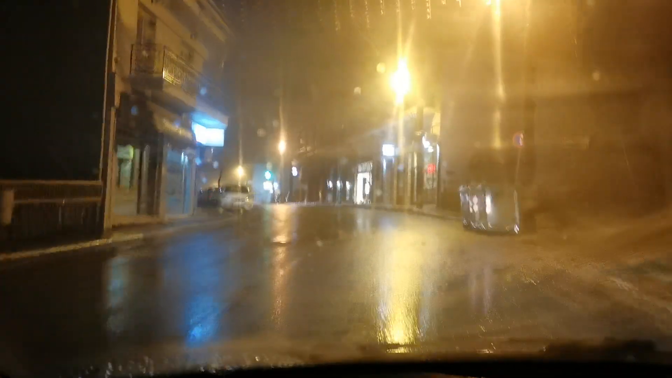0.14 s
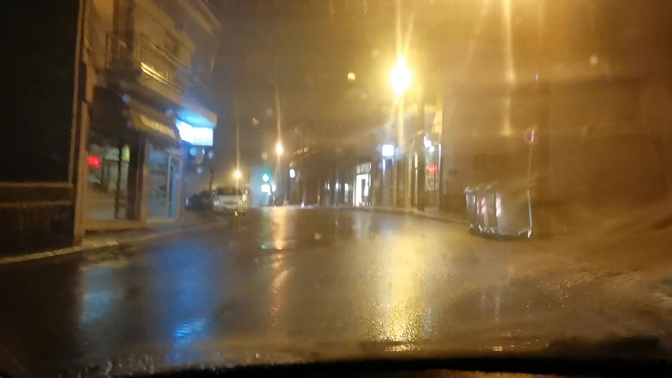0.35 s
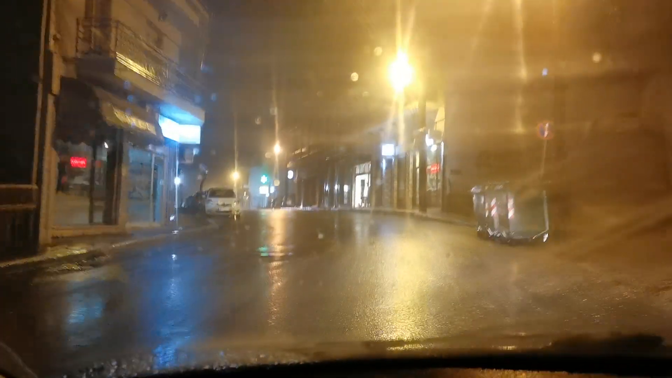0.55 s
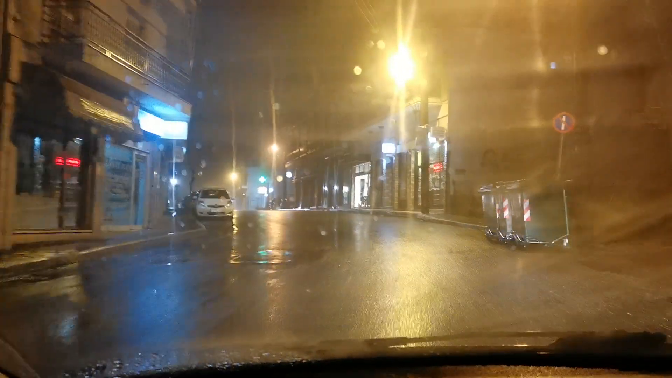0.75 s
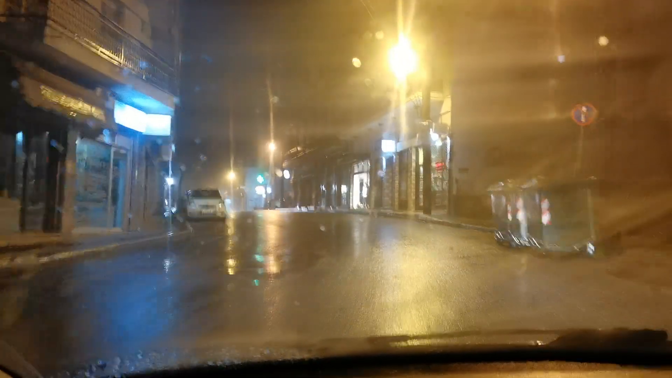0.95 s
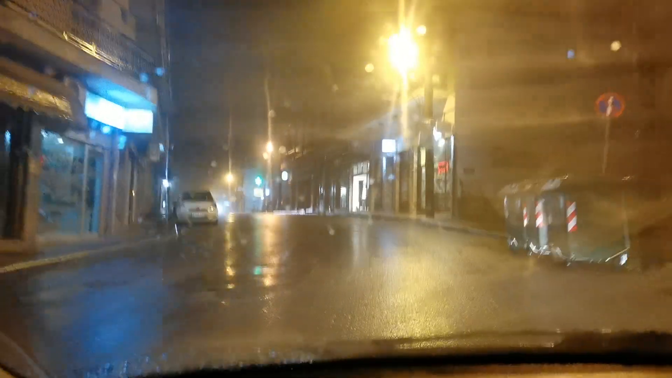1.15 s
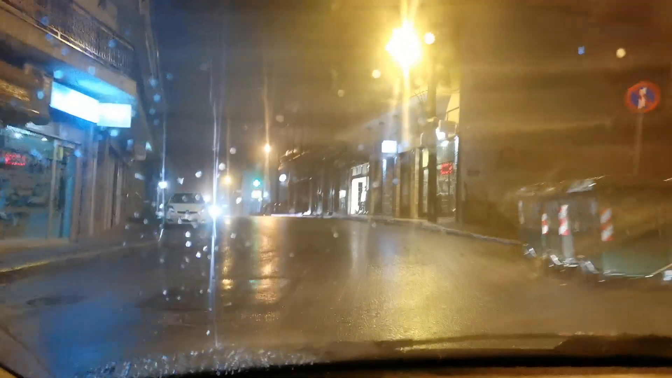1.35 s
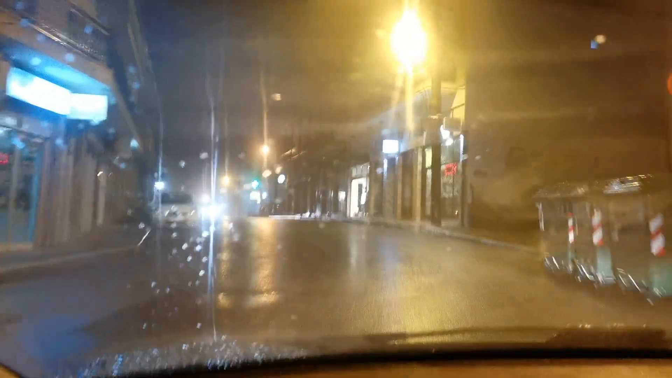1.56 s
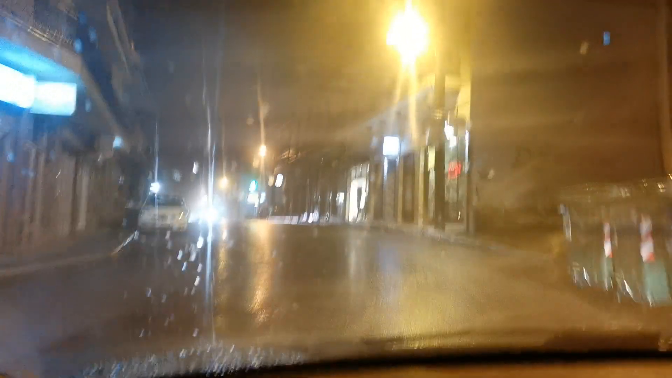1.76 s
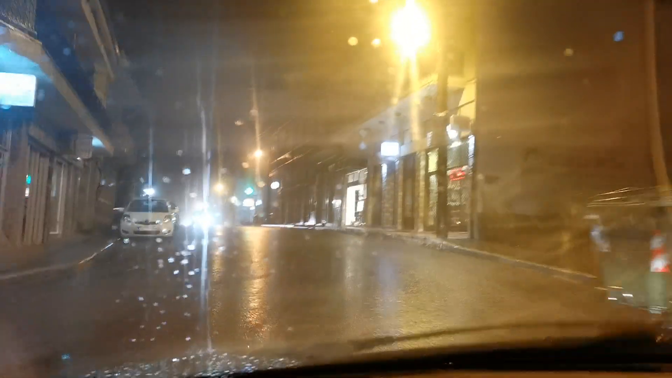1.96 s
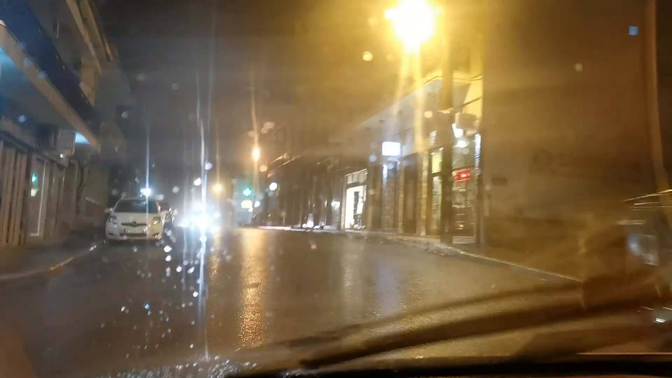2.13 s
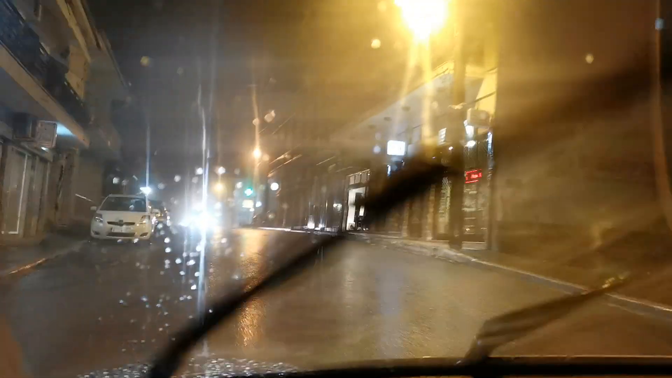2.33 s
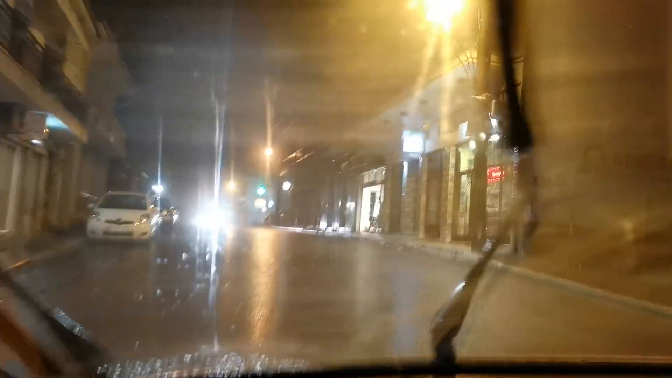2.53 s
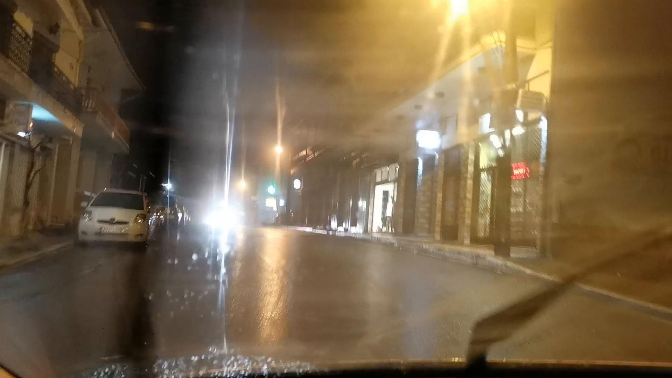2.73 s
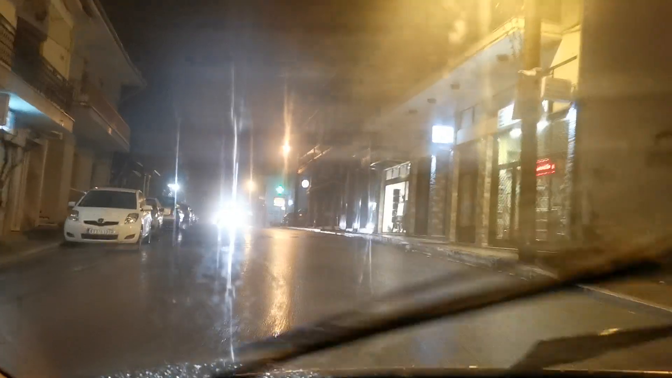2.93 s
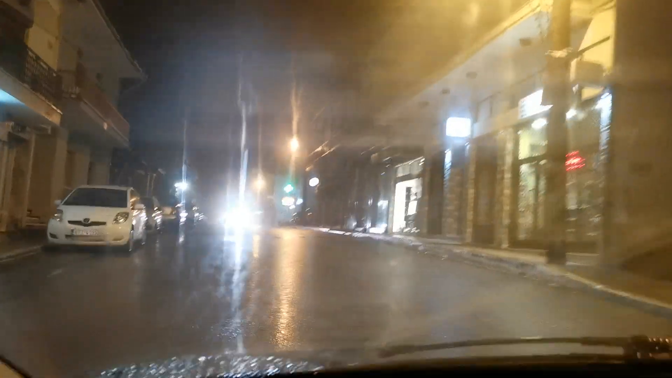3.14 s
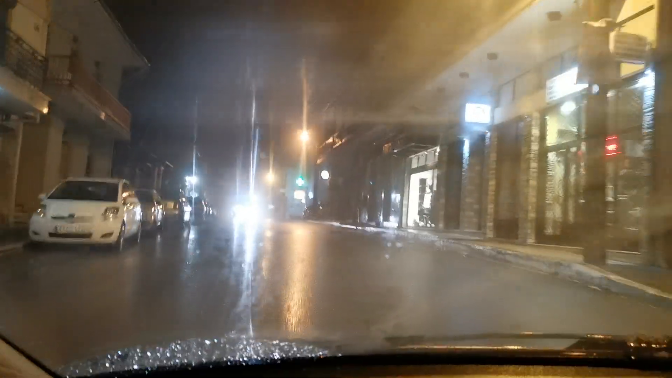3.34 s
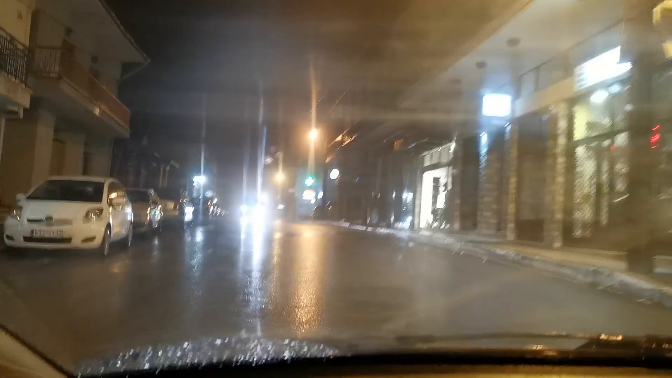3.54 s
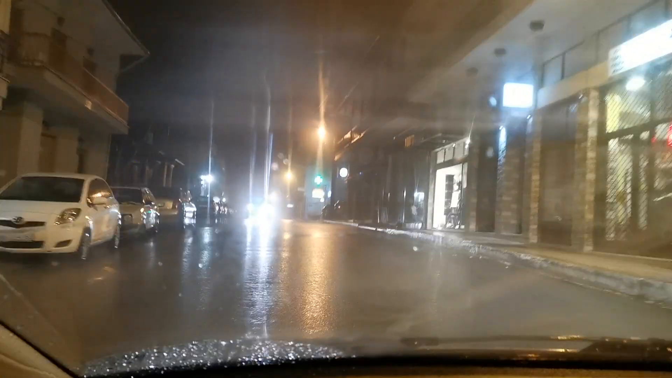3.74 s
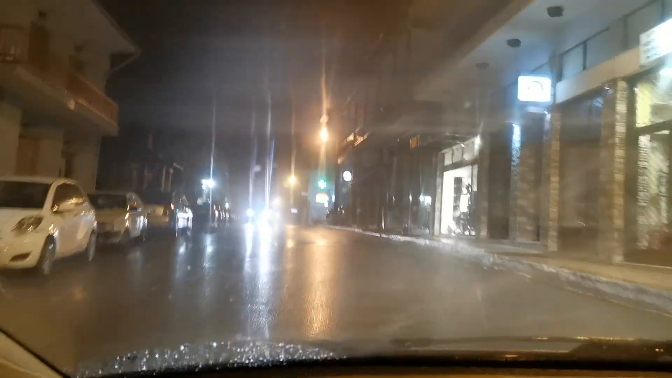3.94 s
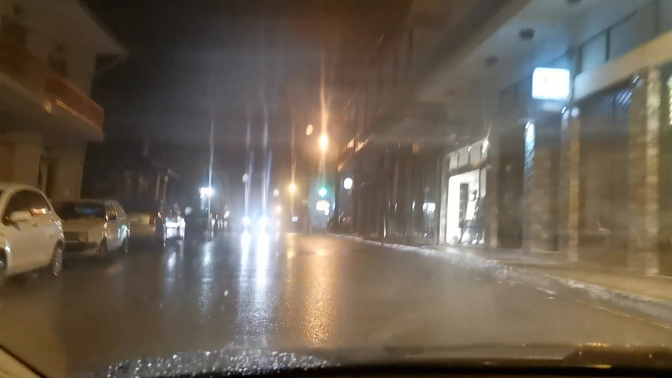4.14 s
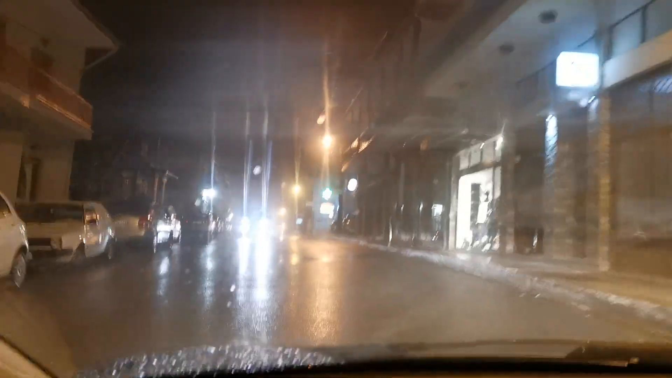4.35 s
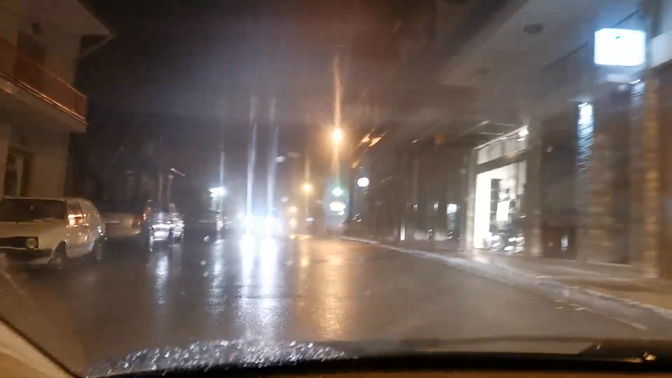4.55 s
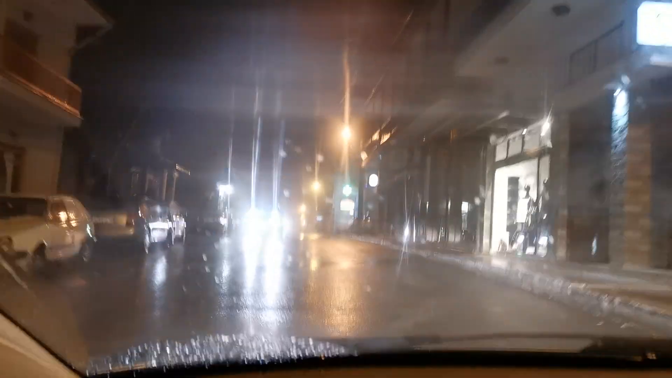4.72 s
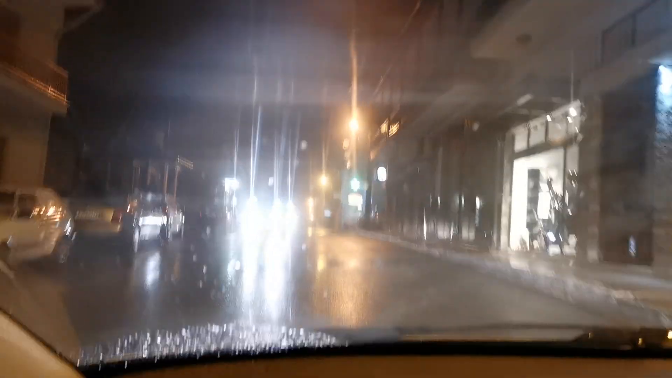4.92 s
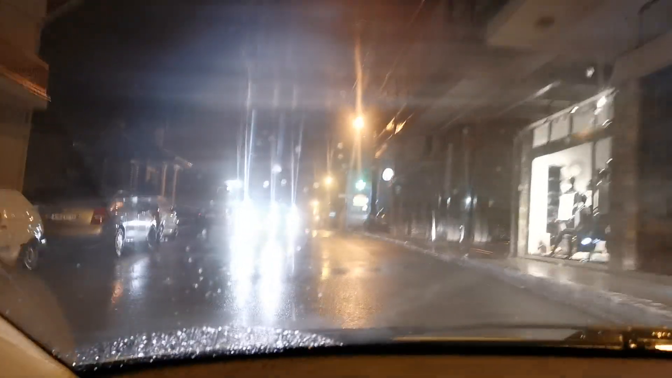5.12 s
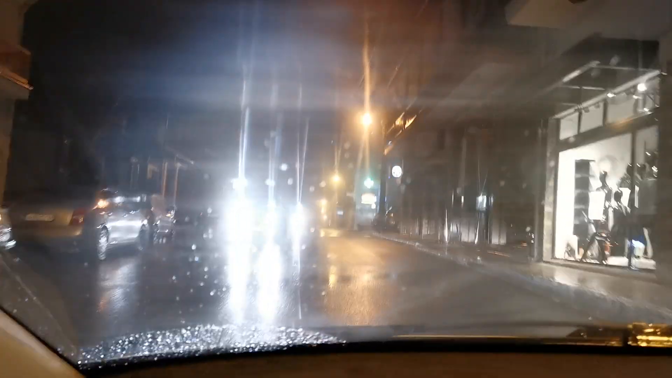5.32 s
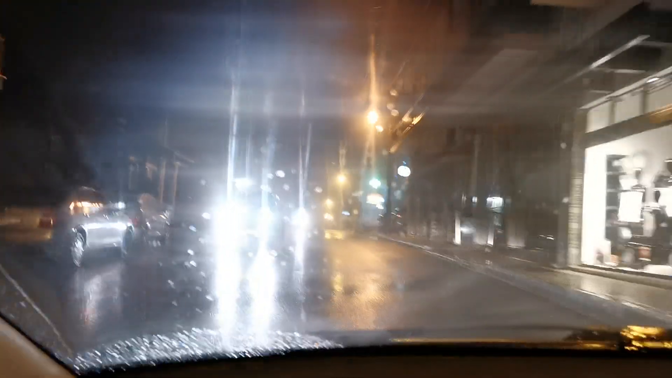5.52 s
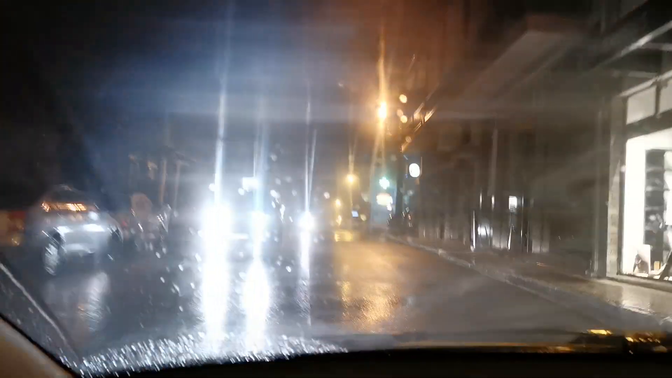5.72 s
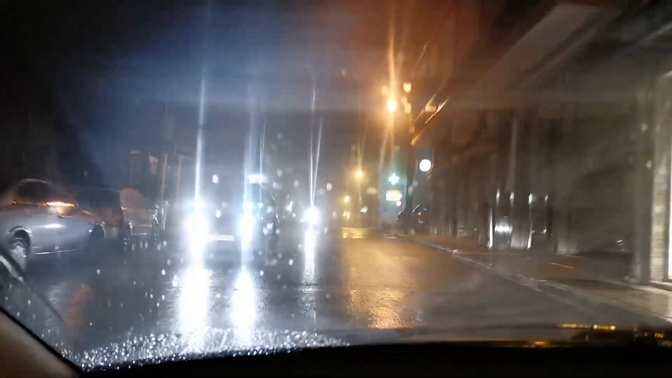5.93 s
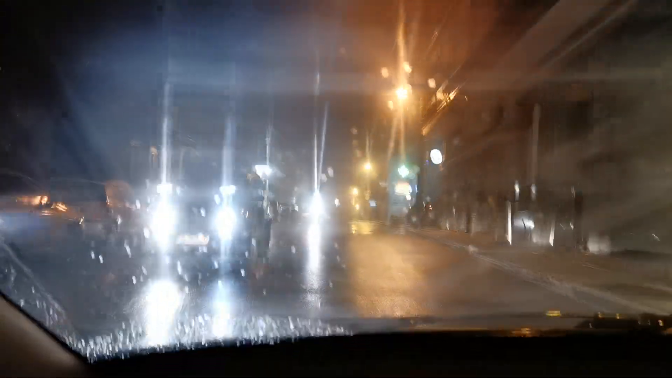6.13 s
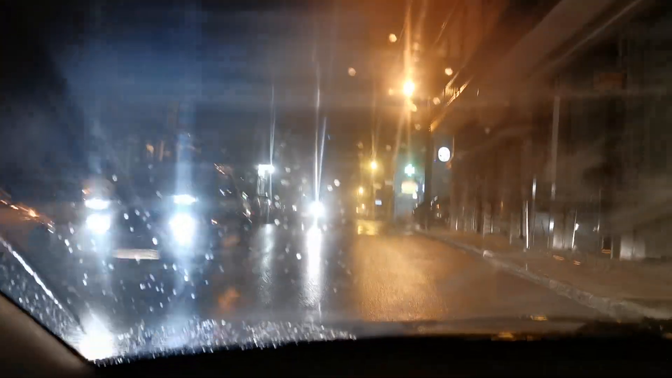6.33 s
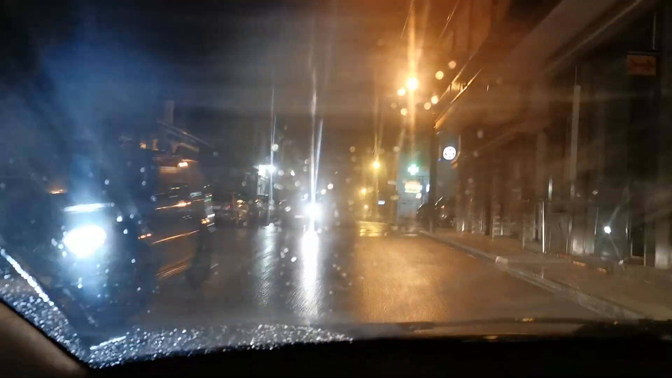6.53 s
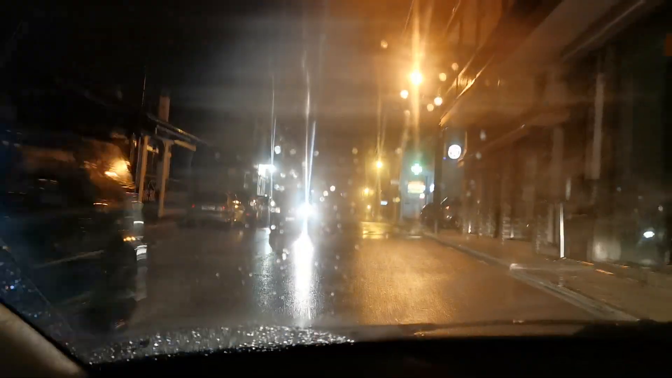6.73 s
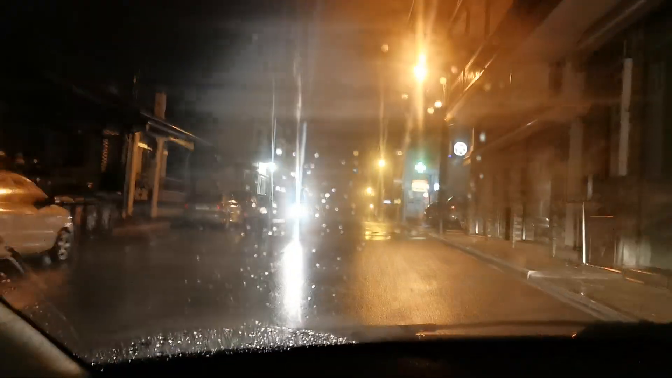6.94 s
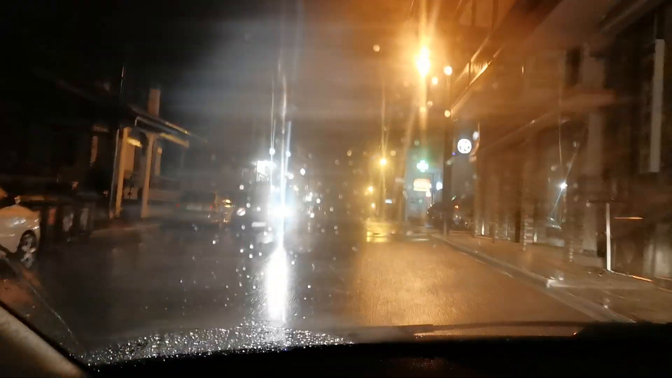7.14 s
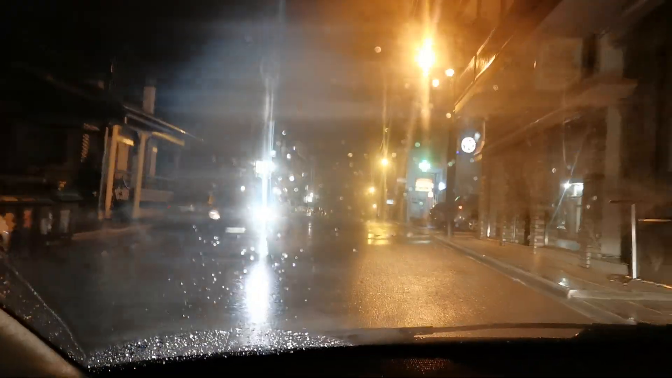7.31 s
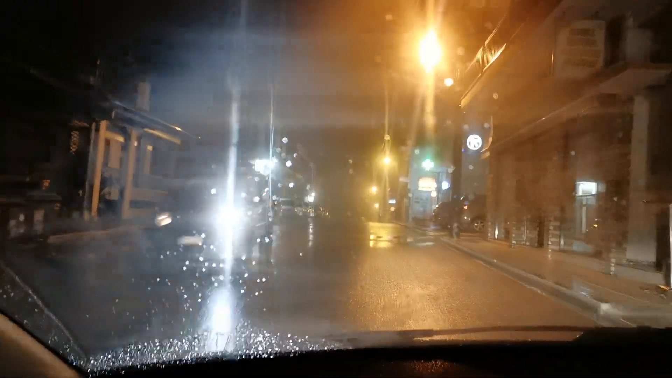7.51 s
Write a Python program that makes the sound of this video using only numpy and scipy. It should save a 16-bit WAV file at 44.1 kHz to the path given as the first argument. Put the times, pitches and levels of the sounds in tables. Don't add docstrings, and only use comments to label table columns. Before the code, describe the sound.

Inside a car on a wet night street, engine hum and road rumble continue while a dry wiper judders loudly once and trim ticks.

```python
import sys
import numpy as np
from scipy import signal
from scipy.fft import rfft, irfft, next_fast_len
from scipy.io import wavfile
from scipy.ndimage import uniform_filter1d

SR = 44100
rng = np.random.default_rng(int(sys.argv[2]) if len(sys.argv) > 2 else 0)


def pcm_store(signal):
    levels = np.round(np.clip(np.atleast_2d(signal), -1, 1) * 32767)
    wavfile.write(sys.argv[1], SR, levels.astype(np.int16).T)


def boost_factor(decibels):
    exponent = np.asarray(decibels, float) / 20
    return 10 ** exponent


N = 338245


def evened(x):
    return x / np.sqrt(np.mean(x ** 2) + 1e-20)


def read(points, hz):
    f, value = np.transpose(points)
    return np.interp(np.log(hz + 1), np.log(f + 1), value)


def curves(rows, t):
    s, *columns = np.transpose(rows)
    return [np.interp(t, s, c) for c in columns]


def ramp(t, s, length):
    return np.clip((t - s) / length + .5, 0, 1)


def wander(n, hz):
    coarse = rng.standard_normal(n // 32 + 202)
    coarse = signal.lfilter(*signal.butter(2, hz, fs=SR / 32), coarse)[200:]
    return evened(np.interp(np.arange(n) / 32, np.arange(len(coarse)), coarse))


def hiss(spectrum, patchy_db, flicker_db, n=N, size=512):
    frames, hz = n * 4 // size + 5, np.fft.rfftfreq(size, 1 / SR)
    a, b, c, d, patches = rng.standard_normal((frames, len(hz), 5)).T
    patches = uniform_filter1d(patches, size // 64, 0)
    patches = evened(uniform_filter1d(patches, 14000 // size, 1))
    flicker = evened(uniform_filter1d(rng.standard_normal(frames), 6000 // size))
    inside = (hz >= spectrum[0][0]) & (hz <= spectrum[-1][0])
    level_db = read(spectrum, hz)[:, None] + patchy_db * patches + flicker_db * flicker
    z = np.array([a + 1j * b, c + 1j * d]) * boost_factor(level_db) * inside[:, None]
    return evened(signal.istft(z, nperseg=size, noverlap=size * 3 // 4)[1][:, :n])


def pedals(t):
    pedal_s = .33
    opened, shut = ramp(t, 2.7, pedal_s), ramp(t, 5.62, pedal_s)
    return 1 - opened, opened * (1 - shut), shut


# f/Hz, level/dB per Hz
FLOOR_RUMBLE = [(8.8, -35), (28, -2), (41, 5.5), (54, -2), (75, -6.5), (97, -9), (129, 2.5), (145, -3.5),
                (173, -8.5), (220, -22), (260, -21.5), (340, -43), (570, -120)]
PANEL_DRONE = [(100, -34), (170, -2), (220, -0.5), (258, -2.5), (291, -7.5), (356, -3), (467, -11.5),
               (537, -9.5), (900, -22), (1170, -52), (1980, -120)]
# f/Hz, level/dB per Hz
SPRAY = [(290, -33), (500, -4), (580, -12.5), (889, -5), (1100, -7.5), (1170, -4.5), (1270, -9),
         (1400, -7.5), (1850, -9.5), (2900, -9.5), (4500, -14.5), (5980, -35), (10100, -120)]
FIZZ = [(3500, -37.5), (4650, -3.5), (5540, 4), (6420, -2.5), (7650, -3), (8300, -15), (9240, -21.5),
        (10000, -27), (12000, -30), (15200, -36.5)]
# t/s, spray level/dB, extra level of fine drops/dB
WATER = [(0, -45.5, -0.5), (.3, -48.5, -4.5), (.58, -47.5, -1), (.77, -44.5, -0.5), (1.05, -47, -4),
         (1.3, -49, -7), (1.85, -52, -8), (2.7, -52, 0), (3.4, -50, -5.5), (3.9, -51, -4),
         (4.15, -48, -6.5), (4.65, -47.5, -6.5), (5.1, -49, -6.5), (5.9, -48.5, -6), (6.4, -49, -5),
         (7.05, -44, -4), (7.33, -39.5, -5.5), (7.67, -43, -6)]


def road():
    t = np.arange(N) / SR
    (spray_db, fine_db), (coast, pull, shut) = curves(WATER, t), pedals(t)
    rumble_db = -31 - 1.5 * pull
    drone_db = -40.5 * coast - 41 * pull - 46 * shut
    rumble = boost_factor(rumble_db) * hiss(FLOOR_RUMBLE, 1.8, 0.98, size=4096)
    drone = boost_factor(drone_db) * hiss(PANEL_DRONE, 1.2, 0.99, size=2048)
    spray = boost_factor(spray_db + 0.9) * hiss(SPRAY, 0.75, 0.66)
    fizz = boost_factor(spray_db + fine_db - 1.23) * hiss(FIZZ, 0.5, 1.6)
    return rumble + drone + spray + fizz


# t/s, f/Hz
FIRING = [(0, 70.2), (1.8, 66.55), (2.8, 64), (4.1, 62), (4.6, 63.2), (5.7, 63.29), (6.0, 53.33), (6.2, 45),
          (6.5, 40.6), (7.1, 33.87), (7.67, 29.7)]
# multiple of firing rate, coasting level/dB, pulling level/dB
UPPER_ORDERS = [(2, 4, 5), (2.25, 7.5, 2.5), (3, -8.5, 2), (3.75, 2.5, -14), (4, -17, 0.5),
                (4.25, -8.5, -2), (5, -7.5, -19.5), (5.75, -22.5, -6.5), (6, -5.5, -7)]


def engine():
    t = np.arange(N) / SR
    (hz,), (coast, pull, _) = curves(FIRING, t), pedals(t)
    clutch_open = ramp(t, 6.05, .33)
    tone_db = -34 + 1.5 * pull - 5.5 * clutch_open
    turns = np.cumsum(hz) / SR
    out = boost_factor(tone_db + 1.9 * wander(N, 7.4)) * np.sin(2 * np.pi * turns)
    for k, coast_db, pull_db in UPPER_ORDERS:
        level = coast * boost_factor(coast_db - 46.5) + pull * boost_factor(pull_db - 48.5)
        phase = k * turns + .05 * wander(N, 5) + rng.random()
        out += level * boost_factor(2.5 * wander(N, 6)) * np.sin(2 * np.pi * phase)
    return np.sqrt(2) * out


# t/s, length/s, lowest
# f/Hz, highest f/Hz, level/dB
SPLASHES = [(2.743, 0.069, 4800, 10000, -55), (3.447, 0.11, 5100, 11000, -53),
            (3.45, .11, 13000, 17500, -72), (3.9, 0.084, 6500, 9200, -56), (2.91, 0.18, 230, 600, -29.5),
            (.57, 0.075, 5400, 8200, -47), (4.297, 0.052, 630, 1400, -43),
            (4.608, 0.067, 1500, 7400, -46.5), (5.883, 0.052, 350, 7900, -44.5),
            (6.22, 0.063, 3800, 7600, -48.5)]
# t/s, length/s, f/Hz, level/dB
SINGING = [(3.075, .05, 720, -47), (3.3, .04, 1250, -50), (7.14, .07, 1170, -48), (7.2, .07, 1180, -43),
           (7.23, .12, 1460, -48), (7.2, .07, 2080, -50), (7.3, .07, 880, -46), (7.33, .06, 1360, -47),
           (7.36, .06, 1170, -46), (6.59, .05, 1640, -54)]


def splashes():
    out = np.zeros((2, N))
    for s, length, low_hz, high_hz, db in SPLASHES:
        n = round(length * SR)
        puff = hiss([(low_hz, 0), (high_hz, -16)], 2.5, 1.5, n=n) * np.hanning(n)
        out[:, round(s * SR):][:, :n] += boost_factor(db) * puff
    for s, length, hz, db in SINGING:
        t = np.arange(0, length, 1 / SR)
        tone = np.sin(2 * np.pi * (hz * t + 0.031 * wander(len(t), 40))) * np.hanning(len(t))
        out[:, round(s * SR):][:, :len(t)] += boost_factor(db + 3 + 3 * wander(len(t), 60)) * tone
    return out


# t/s, level/dB, crack level/dB, crack length/s
TICKS = [
    (2.965, -37, -13, 0.0053),
    (3.263, -25.5, -8, 0.0054),
    (3.36, -18, 5.5, 0.0055),
    (5.0028, -19.5, -0.5, 0.0039),
]
# f/Hz, level/dB, time to fade by 60 dB/s
PARTS = [
    [(2520, 0, .04), (1850, -8, .04)],
    [(3650, 0, .03), (2110, -8, .03), (1310, -7, .03)],
    [(1580, 1, .03), (1760, -7, .03), (2250, 0, .045), (2760, -2, .04), (1250, -17, .04), (3300, -14, .03),
     (7700, -3, .03)],
    [(1900, 0, .022), (2600, 0, .03), (1600, -3, .02), (1150, -4, .02), (3200, -10, .02), (3900, -14, .02),
     (600, -6, .02)],
]
# f/Hz, level/dB per Hz
CRACK = [(400, -14), (900, -7), (1600, 0), (2700, 0), (3400, -7), (5000, -11), (6800, -12), (7800, -8),
         (9200, -30), (12000, -44), (15200, -50)]


def ticks():
    out, t = np.zeros(N), np.arange(6000) / SR
    for (s, peak_db, crack_db, length), modes in zip(TICKS, PARTS):
        after = np.maximum(t - length, 0)
        ring = sum(boost_factor(db - 60 * after / t60) * np.sin(2 * np.pi * (hz * t + rng.random()))
                   for hz, db, t60 in modes)
        edge = boost_factor(-60 * after / .024) + 1.2 * np.exp(-t / .0015)
        crack = boost_factor(crack_db - 12) * edge * hiss(CRACK, 0.29, 0.55, n=len(t))[0]
        rise = np.sin(np.pi / 2 * np.minimum(t / .0006, 1)) ** 2
        snap = (ring / abs(ring).max() + crack) * rise
        out[round(s * SR):][:len(t)] += boost_factor(peak_db - 3) * snap
    return out


# f/Hz, half width/Hz, level/dB
GLASS = [(401, 45, 8), (577.5, 40, 10.5)]


def judder(rows, overtones_db, uneven):
    t = np.arange(rows[0][0], rows[-1][0], 1 / SR)
    hz, level_db = curves(rows, t)
    glass_db = sum(db * np.exp(-((2 * hz - mode_hz) / width_hz) ** 2)
                   for mode_hz, width_hz, db in GLASS)
    turns = np.cumsum(hz * (1 + .18 * uneven * wander(len(t), 70))) / SR
    overtones = 0
    for k in range(1, 8):
        wave = np.sin(2 * np.pi * (k + 1) * turns + 0.76 * k)
        overtones = overtones + k ** -1.3 * boost_factor(3.7 * wander(len(t), 30)) * wave
    stop_s = .027
    ends = signal.windows.tukey(len(t), .03) * (1 - ramp(t, t[-1] - stop_s / 2, stop_s))
    slips = (np.sin(2 * np.pi * turns) + boost_factor(overtones_db + glass_db) * overtones) * ends
    stumble_db = 16 * uneven * np.tanh(wander(len(t), 60))
    return np.sqrt(2) * boost_factor(level_db + stumble_db) * slips, turns


# f/Hz, level/dB per Hz
SCRAPE_TOP = [(3000, -26.5), (3800, -4), (4400, -1.5), (5900, -3), (6400, -9), (7700, -9.5), (8400, -24.5),
              (9500, -31), (12000, -46), (15200, -53)]
RUB = [(120, -30), (200, -6), (340, 4), (550, -1.5), (950, -4), (1200, -12), (1600, -33.5)]


def scraping(t, rasp, level_db, treble_db, rub_db):
    layers = ((rasp, level_db), (SCRAPE_TOP, treble_db), (RUB, rub_db))
    noise = sum(boost_factor(db) * hiss(colour, 1.0, 0.3, n=len(t)) for colour, db in layers)
    return boost_factor(1.54 * wander(len(t), 49)) * noise * signal.windows.tukey(len(t), .05)


# t/s, slip rate f/Hz, level/dB
BLADES = [
    [(2.052, 137, -35), (2.064, 138.5, -17), (2.105, 143.5, -17), (2.135, 166, -26)],
    [(2.065, 206.2, -30), (2.1, 222, -19), (2.23, 241.7, -19.5), (2.26, 239.8, -30), (2.33, 234.8, -25),
     (2.41, 285, -30), (2.485, 243.4, -15), (2.6, 207.4, -15), (2.69, 188, -17.5)],
    [(2.1, 248.7, -34), (2.14, 273.5, -19), (2.22, 279.5, -17), (2.25, 278.4, -23), (2.35, 282.3, -21.5),
     (2.41, 347.7, -16.5), (2.49, 334.5, -10.5), (2.53, 349.5, -17), (2.685, 297, -22.5)],
    [(2.9, 190.3, -48), (2.945, 206.5, -32.5), (2.995, 249.4, -32), (3.03, 287, -38), (3.12, 374, -51)],
]
# overtone level/dB, unevenness/0-1
EDGES = [
    (-6, .25),
    (-8.5, 0.38),
    (-11.5, .15),
    (-21.5, 0.29),
]
# t/s, rasp level/dB
STROKES = [
    [(2.04, -66), (2.065, -47), (2.114, -29.5), (2.2, -24), (2.255, -27.5), (2.375, -24.5), (2.45, -27),
     (2.476, -16.5), (2.52, -22.5)],
    [(2.85, -55), (2.95, -54.5), (3.14, -48), (3.26, -49), (3.31, -50), (3.35, -54)],
]
# f/Hz, level/dB per Hz
RASP_UP = [(900, -19), (1200, 3.5), (1600, -2.5), (2100, -2), (2800, -4), (3400, -12), (4000, -18.5),
           (4800, -26)]
RASP_BACK = [(900, -12), (1300, -5), (2000, -3), (2700, 0), (3400, -4), (4500, -16)]


def wipers():
    tones, puffs, scrape = np.zeros(N), np.ones(N), np.zeros((2, N))
    for rows, edge in zip(BLADES, EDGES):
        slips, turns = judder(rows, *edge)
        start = round(rows[0][0] * SR)
        at = slice(start, start + len(slips))
        tones[at] += slips
        puffs[at] *= 1 + .4 * np.cos(2 * np.pi * turns) * signal.windows.tukey(len(turns), .2)
    up, back = STROKES

    turn_s, ring_s, dry_s = 2.657, .13, 2.494
    halt_db_per_s, ring_db_per_s = -750, -130
    t = np.arange(up[0][0], turn_s + ring_s, 1 / SR)
    late = np.maximum(t - turn_s, 0)
    level_db = curves(up, t)[0] + halt_db_per_s * late
    treble_db = level_db - 23 + 8 * ramp(t, dry_s, .16)
    rub_db = -21.5 + 5 * ramp(t, dry_s, .12) - 30 * (1 - ramp(t, up[1][0], .034))
    rub_db = rub_db + np.maximum(halt_db_per_s * late, -10 + ring_db_per_s * late)
    scrape[:, round(t[0] * SR):][:, :len(t)] = scraping(t, RASP_UP, level_db, treble_db, rub_db)

    t = np.arange(back[0][0], back[-1][0], 1 / SR)
    level_db = curves(back, t)[0]
    scrape[:, round(t[0] * SR):][:, :len(t)] = scraping(t, RASP_BACK, level_db, level_db - 11, level_db)
    return tones, scrape * puffs / np.sqrt(1.2)


def cabin(x, wet_db):
    t = np.arange(5000) / SR
    tails = rng.standard_normal((2, len(t))) * boost_factor(-60 * t / 0.1)
    wet = signal.oaconvolve(x[None], tails / np.linalg.norm(tails[0]), axes=1)[:, :N]
    return np.array([x + boost_factor(wet_db) * wet[0], wet[1]])


def scene():
    background = road() + engine() + splashes()
    tones, scrape = wipers()
    return background + cabin(ticks(), -18) + cabin(tones, -10) + scrape


# f/Hz, level/dB
APART = [(30, -33), (125, -28), (250, -23), (500, -18), (1000, -13), (2000, -11), (4000, -4), (8000, -2)]
# f/Hz, level/dB
LEAN = [(1000, 0), (1700, .5), (2900, -1.5), (5000, -3.5), (6500, 0), (8000, 13.5), (9500, 10), (12000, 2)]
# f/Hz, angle/radians
LEAD = [(1500, 0), (2300, -.2), (3000, .2), (3700, .7), (4500, 1.2), (5900, 2.0), (7200, 2.0), (8500, .4),
        (9500, .1)]


def two_ports(dry):
    size = next_fast_len(N)
    hz, (left, twin) = np.fft.rfftfreq(size, 1 / SR), rfft(dry, size)
    apart = np.minimum(boost_factor(2 * read(APART, hz)), 1)
    same = (1 - apart) / (1 + apart)
    right = same * left * np.exp(-1j * read(LEAD, hz)) + np.sqrt(1 - same ** 2) * twin
    lean_db = read(LEAN, hz) / 2
    return irfft(np.array([left * boost_factor(lean_db), right * boost_factor(-lean_db)]), size)[:, :N]


def gain_control(ports):
    duck_from_db, duck_share, recover_db_per_s = -20.5, 0.31, 67
    power_db = 10 * np.log10(abs(uniform_filter1d((ports ** 2).mean(0), 3000)) + 1e-12)
    fall = np.arange(N) * recover_db_per_s / SR
    held_db = np.maximum.accumulate(power_db + fall) - fall
    over_db = np.maximum(held_db - duck_from_db, 0)
    return ports / boost_factor(duck_share * uniform_filter1d(over_db, 1000))


def top_cut(x):
    return signal.sosfilt(signal.butter(12, 15140, fs=SR, output="sos"), x)


def record(dry):
    ports = gain_control(two_ports(dry))
    mix = ports / (1 + (ports / .9) ** 8) ** (1 / 8)
    return top_cut(mix)


dry = scene()
out = record(dry)
pcm_store(out)
```